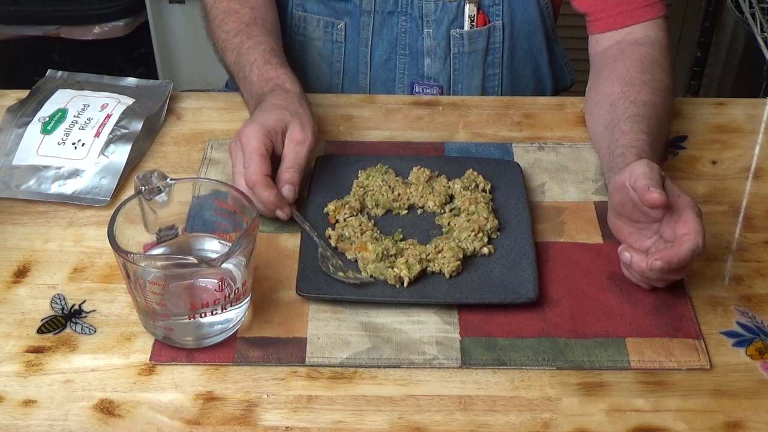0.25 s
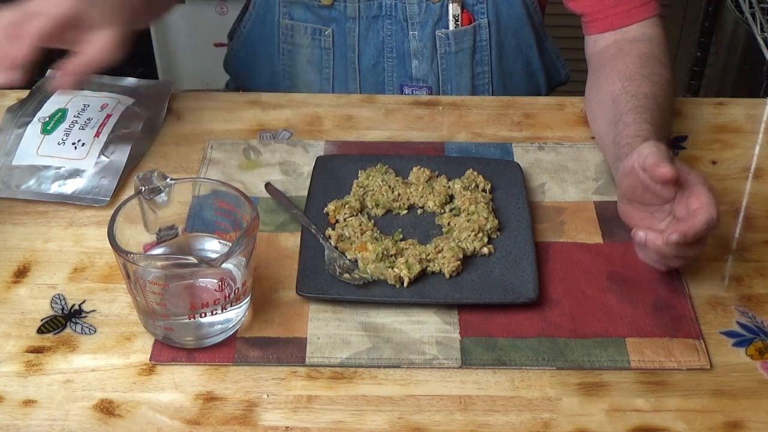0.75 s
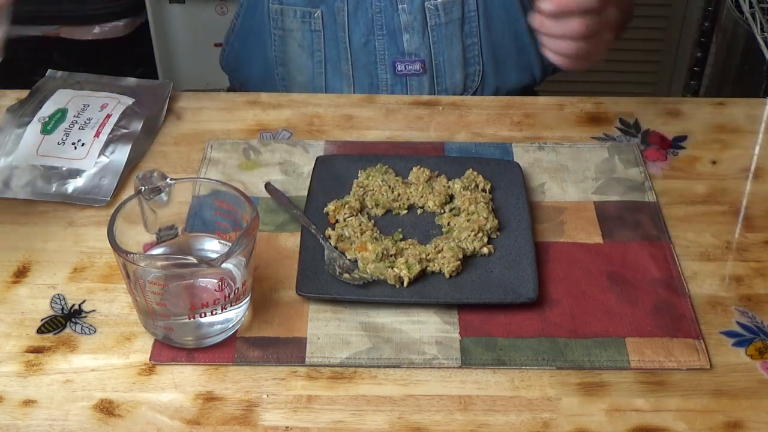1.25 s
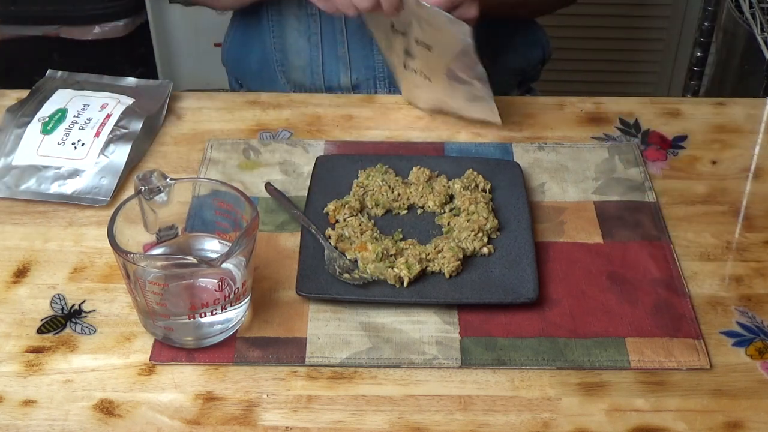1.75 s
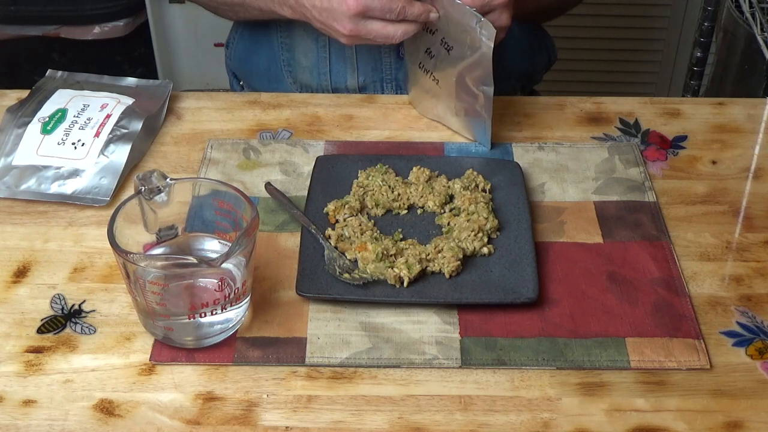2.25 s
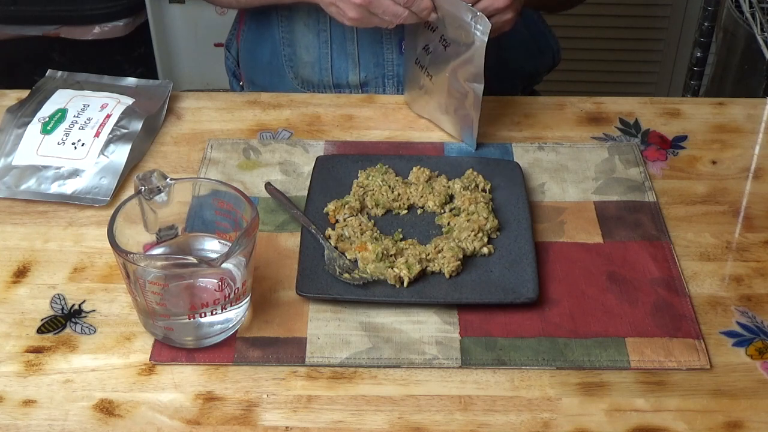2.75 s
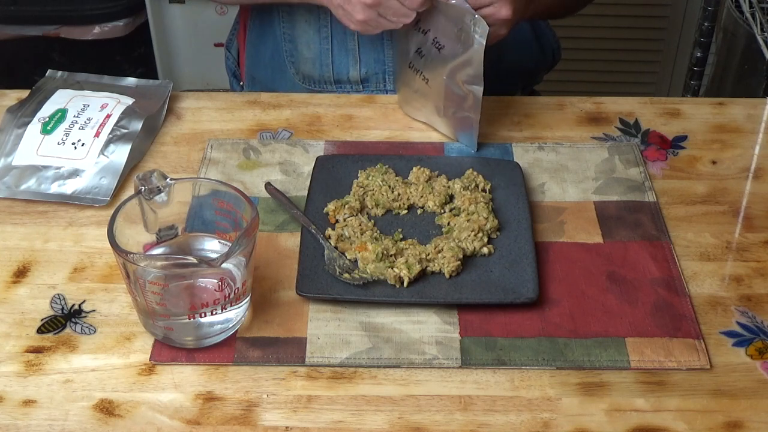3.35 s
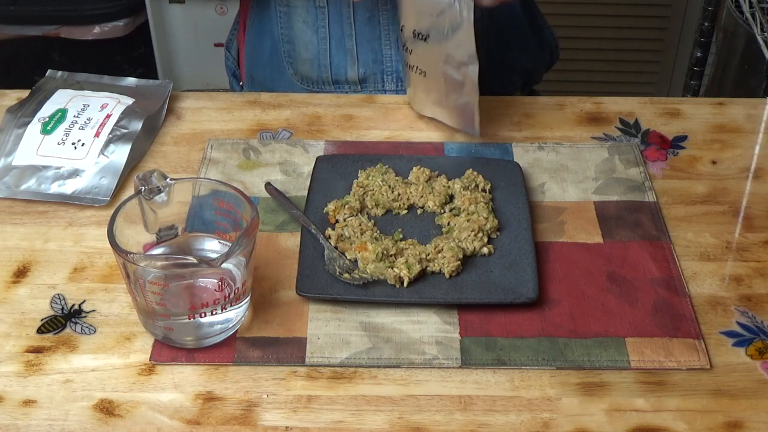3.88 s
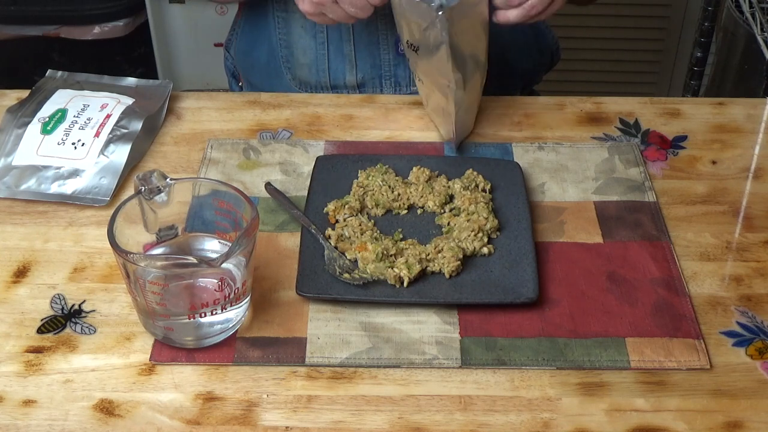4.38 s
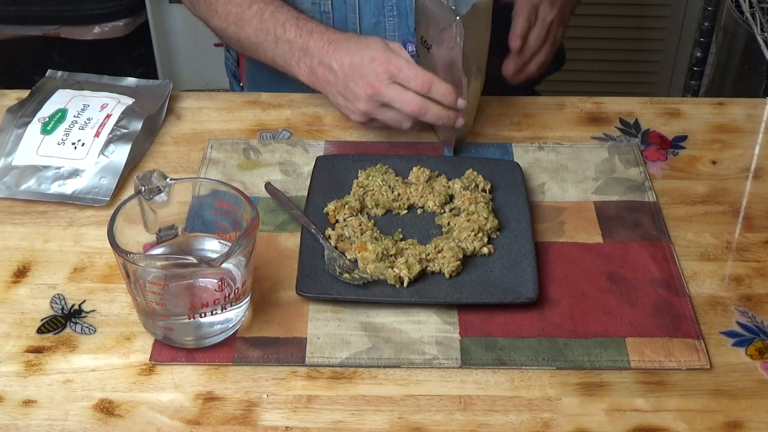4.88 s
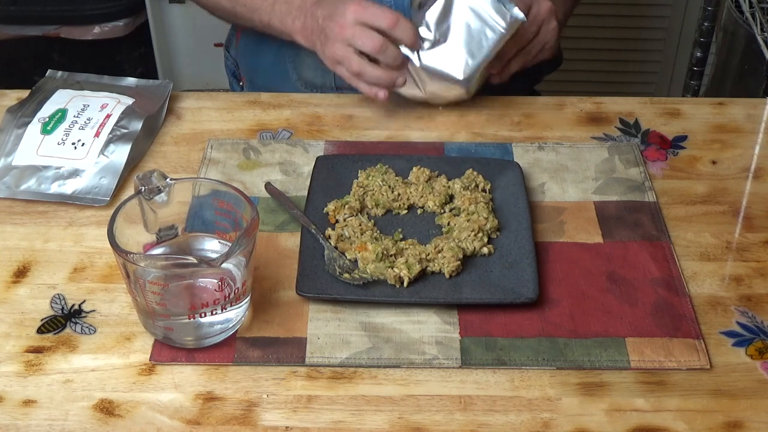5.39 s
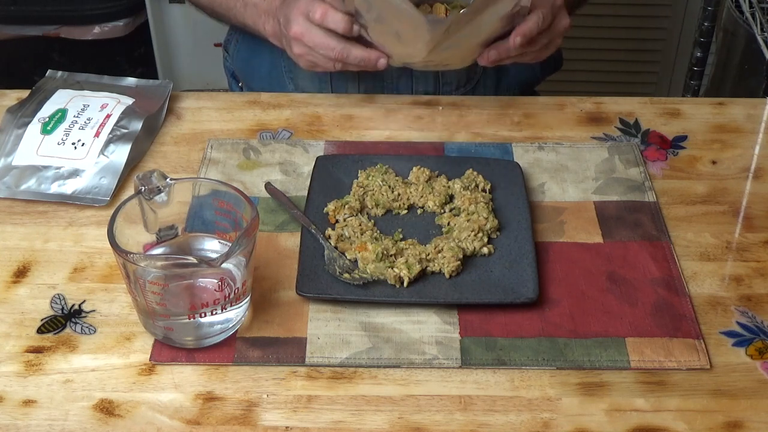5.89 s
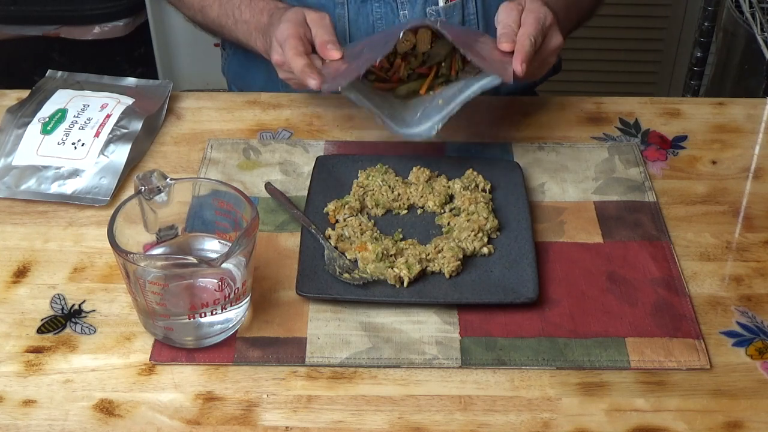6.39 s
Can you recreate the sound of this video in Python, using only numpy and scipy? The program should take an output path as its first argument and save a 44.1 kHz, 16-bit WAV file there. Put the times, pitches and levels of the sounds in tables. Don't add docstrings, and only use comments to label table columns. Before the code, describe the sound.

Bright fork clinks and a quick chatter on a plate, followed by sharp foil creasing, wall pops and finger rubs over a low refrigerator hum.

```python
import sys
import numpy as np
from scipy import signal
from scipy.fft import rfft, irfft, next_fast_len
from scipy.io import wavfile
from scipy.ndimage import map_coordinates

SR = 44100
rng = np.random.default_rng(int(sys.argv[2]) if len(sys.argv) > 2 else 0)


def magnitude_from_level(level_db):
    exponent = np.asarray(level_db, float) / 20
    return 10 ** exponent


def unload_wav(signal):
    wavfile.write(
        sys.argv[1],
        SR,
        np.round(np.clip(np.atleast_2d(signal).T, -1, 1) * 32767).astype(np.int16),
    )


N = 292383


def unit(x):
    return x / np.sqrt(np.mean(x ** 2) + 1e-20)


def along(points, hz):
    f, v = np.transpose(points)
    return np.interp(np.log(hz + 1), np.log(f + 1), v)


def wobble(rate):
    knots = rng.standard_normal(int(N * rate / SR) + 4)
    return map_coordinates(knots, [np.arange(N) * rate / SR])


def coloured(x, spectrum):
    m = next_fast_len(len(x) + 4096)
    gain = magnitude_from_level(along(spectrum, np.fft.rfftfreq(m, 1 / SR)))
    return irfft(rfft(x, m) * gain, m)[:len(x)]


def add(track, s, sound):
    track[round(s * SR):][:len(sound)] += sound


def resonance(f, hz, width):
    return 1j * f * width / (hz * hz - f * f + 1j * f * width)


def grit(n, share):
    ticks = (rng.random(n) < 900 / SR) * rng.standard_normal(n)
    return unit(rng.standard_normal(n) + share * unit(ticks))


# start in seconds, peak level in dB, share of handle contact 0-1, t60 in seconds.
CONTACTS = [(0.3226, -8.5, 0.1, 0.062), (0.3177, -1.5, 0.04, 0.21), (0.4501, -1, 0.66, 0.14),
            (0.457, -4, 0.7, 0.23), (0.4663, -4, 1, 0.11), (0.4728, -6, 0.53, 0.19),
            (0.4811, -3.5, 0.65, 0.11), (0.489, -7, .9, 0.13), (0.5024, -10.5, 0.8, 0.16),
            (0.5184, -11.5, 0.6, 0.082), (0.558, -3, 0.25, 0.15), (0.5769, -5.5, 0.4, 0.1),
            (0.5855, -13.5, 0.6, 0.05), (0.609, -24, 0.9, 0.16)]
# frequency in Hz, cluster width in Hz, level in dB.
TINE_MODES = [(558, 25, -20), (1024, 23, -9), (1250, 30, -28), (1711, 25, -13), (2300, 20, -26),
              (2824, 23, -5), (2765, 20, -15), (2911, 20, -12), (3800, 24, -28), (4110, 20, -15),
              (4182, 45, -12), (4520, 24, -21), (4681, 20, -10), (4706, 20, -7), (4735, 24, -5),
              (5030, 15, -24), (5450, 40, -23), (5755, 32, -6), (6260, 19, -26), (6410, 33, -24),
              (6975, 20, -13), (7000, 20, -16), (7028, 20, -14), (7126, 27, -10), (7530, 53, -21),
              (8458, 47, -14), (8670, 15, -27), (8926, 23, -18), (9458, 42, -23), (10100, 38, -30),
              (10270, 40, -23), (10500, 55, -33), (11250, 64, -29), (12450, 46, -42), (13800, 96, -51),
              (14700, 23, -42)]
# frequency in Hz, cluster width in Hz, level in dB.
HANDLE_MODES = [(1024, 25, -9), (1370, 39, -10), (1708, 28, -11), (2300, 17, -20), (2826, 78, 0),
                (3280, 40, -14), (4040, 49, -3), (4714, 40, -1), (5590, 20, -1), (6070, 26, -17),
                (6710, 41, -24), (7123, 30, -4), (7480, 68, -9), (8345, 30, -12), (8925, 30, -15),
                (9300, 37, -26), (9610, 100, -15), (9840, 28, -20), (10200, 28, -20), (10620, 25, -10),
                (11200, 77, -29), (12400, 33, -29), (12600, 56, -29), (13000, 51, -35), (13500, 69, -46),
                (14200, 100, -44), (14700, 27, -31), (15600, 52, -36)]
# frequency in Hz, density in dB per Hz.
PLATE_COLOUR = [(290, -59.5), (500, -27.5), (1020, -24), (1570, -17), (4660, -2.5), (5160, -14.5),
                (7310, -7), (16000, -34.5)]


def fork():
    out, t = np.zeros(N + SR), np.arange(SR // 5, dtype=np.float32) / SR
    rows = []
    for handle, modes in enumerate((TINE_MODES, HANDLE_MODES)):
        for hz, width, db in modes:
            rows.append((hz, db, 0, handle))
            if width > 35:
                side_db = db + 20 * np.log10(min(width / 50 - .6, .65))
                for side in (-1, 1):
                    rows.append((hz + side * .93 * width, side_db, width, handle))
    hz, level_db, spread, handle = np.float32(np.transpose(rows)[:, :, None])
    octaves = np.log2(hz / 3000)
    for s, db, share, t60 in CONTACTS:
        share = np.float32(np.clip(share, 0, 1))
        level_luck, phase, tuning_luck = rng.standard_normal((3,) + hz.shape, dtype=np.float32)
        mode_gain = magnitude_from_level(level_db + 1.6 * octaves + 1.4 * level_luck)
        size = np.float32(np.where(handle, share, 1 - share) * mode_gain)
        fade = np.exp(-t * np.float32(np.log(1000) / t60 * magnitude_from_level(.1 * octaves)))
        mode_hz = hz + np.float32(.05) * spread * tuning_luck
        ring = np.sum(size * fade * np.sin(np.float32(2 * np.pi) * mode_hz * t + phase), axis=0)
        ring = ring * (1 + 1.66 * magnitude_from_level(-60 * t / 0.036))
        dying = magnitude_from_level(-1.5 - 60 * t / .021) + magnitude_from_level(-6.5 - 60 * t / 0.1014)
        plate = unit(coloured(rng.standard_normal(len(t)), PLATE_COLOUR)) * dying
        attack = 1 - np.exp(-t / 0.00027)
        add(out, s, magnitude_from_level(db - 16) * (ring + plate) * attack)
    return out[:N]


# start in seconds, peak level in dB, panel frequency in Hz, edge level in dB.
BIG_CREASES = [(0.9384, -11, 1650, -8), (0.987, -25, 2890, 14), (1.0201, -20, 2930, 14),
               (1.052, -18.5, 1660, -36), (1.4158, -13.5, 3260, -16), (1.6562, -11, 2160, -8.5),
               (1.6945, -24, 1700, -14), (1.8387, -14, 2560, -17), (1.8588, -22.5, 3190, -9),
               (1.9753, -25, 3600, -26), (2.3492, -22, 3200, 6), (2.395, -12, 5860, -6),
               (2.418, -20, 3150, -4), (2.4574, -19, 5160, -8), (2.7862, -24.5, 5700, -3),
               (2.895, -23.5, 6150, 4), (3.483, -1, 5770, -21), (3.558, -17.5, 4000, -12),
               (3.5614, -4, 2800, -18), (3.6218, -4, 1880, -19), (3.6574, -11.5, 2880, -29),
               (3.669, -14.5, 2960, -8), (3.9137, -24, 2270, -11), (4.0402, -16.5, 2260, -28),
               (4.0761, -16, 2850, -38), (4.3864, -17, 3130, -0.5), (4.561, -19, 1980, -45),
               (4.7372, -23, 3140, -15), (5.3287, -6, 2730, -22), (5.444, -22.5, 4350, -9)]
# start in seconds, peak level in dB, panel
# frequency in Hz.
SMALL_CREASES = [(.8839, -36, 3660), (.8994, -26.5, 1900), (0.9513, -23, 3030), (1.0674, -36, 1700),
                 (1.1253, -29.5, 7500), (1.1713, -36, 1740), (1.334, -38, 6600), (1.375, -30, 2560),
                 (2.2174, -39, 8100), (2.4374, -31, 3390), (2.6267, -33, 8500), (2.6846, -32, 8900),
                 (2.8597, -30.5, 3180), (3.0909, -31, 6060), (3.1154, -40, 2290), (3.934, -30.5, 1860),
                 (5.0237, -26, 2600), (5.048, -33, 2830), (5.0782, -30, 1680), (5.5413, -38, 5030),
                 (5.609, -37, 4050), (5.6396, -31.5, 2140), (5.725, -35, 3030), (5.7508, -31, 2880),
                 (5.881, -35.5, 1910), (5.8964, -35, 3130), (6.1769, -35, 2173), (6.3145, -34, 3210),
                 (6.456, -32.5, 2700), (6.492, -33, 6100),
                 (.9325, -28, 2400), (.9425, -20, 1400), (1.0153, -27, 3000), (1.0553, -25, 5500),
                 (3.4895, -19.5, 2500), (3.494, -19, 1800), (3.503, -17, 3200), (3.512, -23, 4500),
                 (3.538, -22, 1600), (3.573, -23, 2500), (3.628, -20, 2200), (3.636, -23, 3000),
                 (4.99, -36, 1520), (5.2147, -35, 1630), (1.6665, -20.5, 1700), (1.443, -30, 4530),
                 (5.338, -28, 2800), (5.363, -27, 3300), (5.385, -30, 3000), (5.4392, -32.5, 1980),
                 (5.454, -33.5, 3000), (5.495, -40, 1800)]
# time in seconds, effort in dB.
GRIP_EFFORT = [(.8, -65.5), (1.0, -47.5), (1.16, -66), (1.5, -61), (1.89, -66), (2.16, -63.5), (2.42, -59),
               (3.3, -59.5), (3.47, -56), (3.72, -79), (4.05, -51), (4.19, -69), (4.5, -59), (4.81, -70.5),
               (5.02, -51), (5.3, -54.5), (5.44, -61.5), (6.63, -62)]


def creases():
    luck = rng.standard_normal((40, 3))
    s = np.linspace(GRIP_EFFORT[0][0], N / SR - .1, len(luck)) + .05 * luck[:, 0]
    db = np.interp(s, *np.transpose(GRIP_EFFORT)) + 13 + 3 * luck[:, 1]
    chance = zip(s, db, 4500 * magnitude_from_level(2.7 * luck[:, 2]))
    small_edge_db = -22.5
    small = SMALL_CREASES + list(chance)
    return BIG_CREASES + [(*row, small_edge_db) for row in small]


def snaps():
    out, t = np.zeros((N + SR, 2)), np.arange(2048) / SR
    f = np.fft.rfftfreq(len(t), 1 / SR)
    for s, db, hz, edge_db in creases():
        t60_s = .0085 if db > -27 else .012
        attack = (1 - np.exp(-t / 0.00069)) ** 2
        burst = rng.standard_normal(len(t)) * magnitude_from_level(-60 * t / t60_s) * attack
        burst[round(.001 * SR)] += 2.2
        soft_hz = 12000 * magnitude_from_level(0.22 * edge_db)
        panel = resonance(f, hz, 0.39 * hz) ** 2
        body = panel + 0.7 * resonance(f, 2810, 4200) ** 2 / (1 + 1j * f / soft_hz) ** 2
        colour = body - magnitude_from_level(edge_db - 0.5) * resonance(f, 6730, 6100) ** 2
        snap, click = irfft(rfft(burst) * colour), irfft(colour)
        snap = magnitude_from_level(db + 2.5) * snap / np.max(np.abs(snap))
        click = click * np.linalg.norm(snap) / np.linalg.norm(click)
        add(out, s, np.array([snap, click]).T)
    return out[:N].T


# start in seconds, peak level in dB, panel frequency in Hz, table thud in
# dB.
WALL_POPS = [(.938, -15, 1320, -23), (.947, -18.5, 630, -33), (1.018, -30, 1000, -23),
             (1.051, -20, 640, -30), (1.414, -35.5, 366, -29), (1.654, -19.5, 1050, -35),
             (1.693, -17, 890, -35), (1.837, -15, 780, -16), (1.847, -26.5, 940, -6),
             (1.857, -23, 1240, -17), (2.392, -31, 910, -26), (3.482, -27.5, 580, -27),
             (3.539, -27.5, 700, -11), (3.558, -16.5, 700, -19), (3.62, -18, 795, -41),
             (3.658, -17, 880, -26), (3.679, -17.5, 405, -14), (3.911, -23, 755, -14.5),
             (4.052, -21, 740, -21), (4.074, -17.5, 705, -34), (4.084, -18.5, 820, -12),
             (4.384, -27.5, 685, -7), (4.561, -20.5, 765, -16), (4.594, -28, 760, -19),
             (5.023, -23, 590, -15), (5.032, -27.5, 900, -25), (5.328, -19, 790, -33),
             (5.361, -28, 950, -16), (5.75, -26, 890, -24), (6.452, -30, 850, -21),
             (.886, -35, 500, -30), (.899, -37, 520, -30), (.964, -31, 430, -30), (1.066, -28, 750, -27),
               (3.57, -23.5, 600, -25), (3.627, -21, 750, -30), (3.67, -22, 800, -30),
               (5.085, -33, 759, -25), (5.115, -34.5, 525, -25), (1.374, -33, 905, -30),
               (2.908, -34, 400, -30), (3.115, -35, 890, -30), (3.905, -32, 900, -30),
               (3.94, -32, 754, -30), (4.115, -28, 760, -25), (4.227, -33.5, 950, -30),
               (3.69, -26, 1000, -30), (2.062, -32.5, 650, -30), (5.337, -26.5, 450, -20),
               (5.362, -32.5, 330, -20), (5.409, -31, 700, -20), (5.438, -35.5, 589, -25),
               (5.492, -34, 850, -30), (5.63, -37, 565, -25)]
# start in seconds, peak level in dB, panel frequency in Hz, table thud in dB.
BASE_FLIP = [
    (4.0755, -19.5, 380, -14),
]


def pops():
    out, t = np.zeros(N + SR), np.arange(4096) / SR
    f = np.fft.rfftfreq(len(t), 1 / SR)
    for s, db, hz, thud_db in WALL_POPS + BASE_FLIP:
        push = 4.4 * magnitude_from_level(-60 * t / 0.00098)
        rough = rng.standard_normal(len(t)) * 1.53 * np.minimum(t / 0.00078, 1) * magnitude_from_level(-60 * t / .03)
        panel = resonance(f, hz, 1.67 * hz) * (resonance(f, hz, 0.28 * hz) + 0.27)
        pop = irfft(rfft(push + rough) * panel / (1 + 1j * f / (3 * hz)) ** 2)
        table = np.sin(2 * np.pi * 192 * t) + 0.12 * np.sin(2 * np.pi * 325 * t)
        thud = magnitude_from_level(thud_db - 60 * t / 0.11) * table
        add(out, s + 0.001785, magnitude_from_level(db + 2.0) * (pop / np.max(np.abs(pop)) + thud))
    return out[:N]


# centre in seconds, rms level in dB, frequency in Hz, breadth 0-1, length in seconds.
FINGER_SLIPS = [(.92, -44, 1900, .3, 0.028), (5.12, -50.5, 6000, .8, .04), (1.74, -50.5, 110, .8, .09),
                (1.016, -39, 7000, 1, 0.044), (1.123, -52, 5000, .8, .03), (1.53, -59, 3200, 0.13, 0.098),
                (1.633, -55, 3000, 0.1, 0.052), (1.97, -44, 3900, 0.9, .05),
                (2.064, -40.5, 1680, 0.48, 0.055), (2.723, -42.5, 1680, 0.42, 0.045),
                (2.878, -47, 4030, 1, .07), (3.099, -45.5, 5200, 1, 0.036), (3.231, -54.5, 6500, 1, 0.046),
                (3.455, -45.5, 2780, 0.35, 0.068), (3.519, -32, 4300, 0.6, .06),
                (3.997, -49, 6400, 0.4, .06), (4.527, -47.5, 4700, 1, 0.074),
                (4.738, -45.5, 4700, 0.95, 0.016), (5.09, -45.5, 2700, 0.9, .06),
                (5.7, -55, 1700, .6, 0.036), (5.276, -51, 5900, 0.3, 0.1), (5.269, -46.5, 2000, 0.9, .12),
                (5.72, -49.5, 2900, 0.4, .03), (5.638, -48, 3000, 0.5, 0.022),
                (5.895, -47, 3600, 0.4, 0.028), (6.317, -41, 8400, 1, .03), (6.497, -40.5, 8000, 1, .03),
                (6.456, -44, 7600, 1, 0.023)]


def slides():
    out, u = np.zeros(N + SR), np.linspace(-1.5, 1.5, 40)
    for s, db, hz, breadth, length in FINGER_SLIPS:
        n = round(3 * length * SR)
        uneven = np.exp(-4 * u * u) * magnitude_from_level(3.5 * rng.standard_normal(len(u)))
        swell = np.interp(np.linspace(-1.5, 1.5, n), u, uneven)
        f = np.fft.rfftfreq(n, 1 / SR)
        panel = resonance(f, hz, breadth * hz) ** 2
        foil = panel + 1.24 * breadth * resonance(f, 2870, 7600) ** 2
        rough = irfft(rfft(grit(SR, share=0.84)[:n]) * foil, n)
        add(out, s - 1.5 * length, magnitude_from_level(db) * swell * unit(rough))
    return out[:N]


def effort_db():
    t, kicks = np.arange(N) / SR, np.zeros(N)
    for s, db, *_ in BIG_CREASES:
        kicks[round(s * SR)] = magnitude_from_level(db - 39)
    tremble_t60_s = 0.33
    tremble = signal.lfilter([1], [1, -magnitude_from_level(-60 / (tremble_t60_s * SR))], kicks)
    return 20 * np.log10(magnitude_from_level(np.interp(t, *np.transpose(GRIP_EFFORT))) + tremble)


# frequency in Hz, density in dB per Hz.
RUB_COLOUR = [(300, -71), (700, 5.5), (1500, 2), (3000, -3), (5000, -16), (8000, -46)]
# frequency in Hz, density in dB per Hz.
FIZZ_COLOUR = [(2500, -11.5), (4500, -0.5), (6500, -2), (9000, -8), (12000, -10.5), (16000, -32.5)]


def rustle():
    fizz_db = effort_db()
    even_db = -58.5
    rub_db = even_db + 1.35 * (fizz_db - even_db)
    shared = 2.85 * (0.42 * wobble(24.8) + wobble(90))
    fizz_own = 2.85 * wobble(60)
    out = 0
    for db, spectrum, own in ((rub_db, RUB_COLOUR, 0), (fizz_db, FIZZ_COLOUR, .7)):
        friction = unit(coloured(grit(N, share=0.5), spectrum))
        out = out + magnitude_from_level(db) * unit(magnitude_from_level(shared + own * fizz_own) * friction)
    return out


# frequency in Hz, t60 in seconds.
KITCHEN_DECAY = [(200, 0.23), (1000, 0.34), (4000, 0.29), (9000, 0.2), (15000, 0.066)]


def kitchen(x, gap=.003, early_db=6, early_t60=0.087):
    out, step = np.zeros(N + 2 * SR), 8000
    for k in range(0, len(x), step):
        hz, t, z = signal.stft(rng.standard_normal(SR // 3), SR, nperseg=256)
        early = magnitude_from_level(early_db - 60 * t / early_t60)
        shape = magnitude_from_level(-60 * t / along(KITCHEN_DECAY, hz)[:, None]) + early
        tail = signal.istft(z * shape, SR, nperseg=256)[1]
        add(out, k / SR + gap, signal.fftconvolve(x[k:k + step], tail / np.linalg.norm(tail)))
    return out[:N]


# frequency in Hz, density in dB per Hz.
ROOM_COLOUR = [(15, -27.5), (38, -32), (55, -2.5), (87, -14.5), (117, 0.5), (146, -12.5), (167, -6),
               (356, -2), (443, -8), (493, -6), (613, -8), (1030, -11), (1910, -26), (2130, -22),
               (16300, -43)]
# frequency in Hz, rms level in dB.
HUM_LINES = [(59.5, -65), (119, -69), (237, -63), (14000, -88), (15735, -88)]


def room_tone():
    t = np.arange(N) / SR
    lines = 0
    for hz, db in HUM_LINES:
        level_db = db + 5 + 1.1 * wobble(6.1) + 2.2 * (hz > 9000) * wobble(30)
        lines = lines + magnitude_from_level(level_db) * np.sin(2 * np.pi * hz * t + 0.46 * wobble(3.2))
    noise = unit(coloured(rng.standard_normal(N), ROOM_COLOUR))
    return magnitude_from_level(-48 + 0.89 * wobble(2.975)) * noise + lines


# frequency in Hz, gain in dB.
FOIL_DAMPING = [(9000, -1), (11500, -7.5), (14000, -18.5), (16500, -19.5)]
# frequency in Hz, gain in dB.
MIC_RESPONSE = [(40, -30), (130, -7.5), (250, 3), (16500, -3)]


def scene():
    steel = fork()
    snap, spread = snaps()
    soft = pops() + slides() + rustle()
    foil = coloured(snap + soft + magnitude_from_level(-5.0) * kitchen(spread + soft), FOIL_DAMPING)
    near = steel + magnitude_from_level(-6) * kitchen(steel[:SR]) + foil
    return (coloured(near, MIC_RESPONSE) + room_tone())[None]


def band_limit(x):
    return signal.sosfilt(signal.butter(12, 16500, fs=SR, output="sos"), x)


def record(dry):
    limited = dry / (1 + np.abs(dry / .86) ** 6) ** (1 / 6)
    top_hz = 15850
    mix = coloured(limited[0], [(top_hz, 0), (top_hz + 60, -35)])[None]
    return band_limit(mix)


dry = scene()
out = record(dry)
unload_wav(out)
```